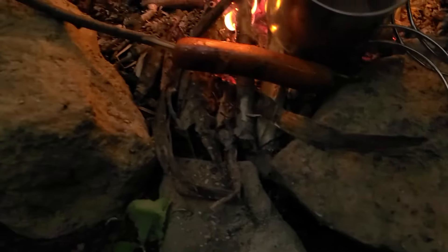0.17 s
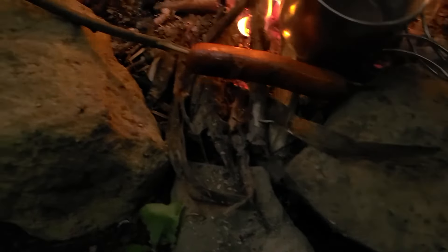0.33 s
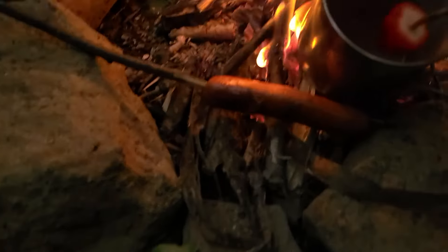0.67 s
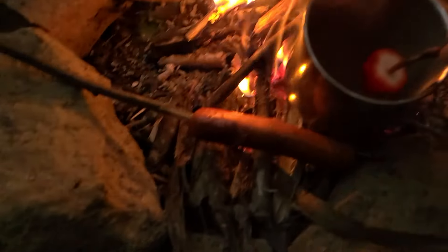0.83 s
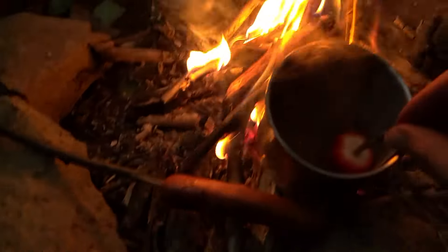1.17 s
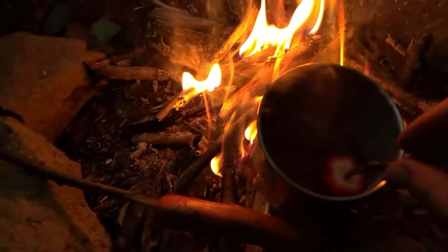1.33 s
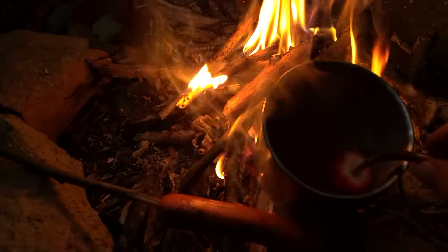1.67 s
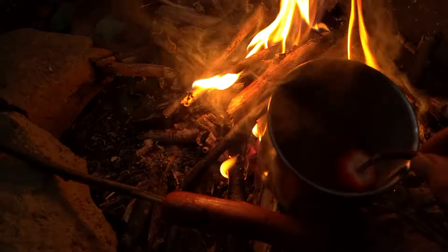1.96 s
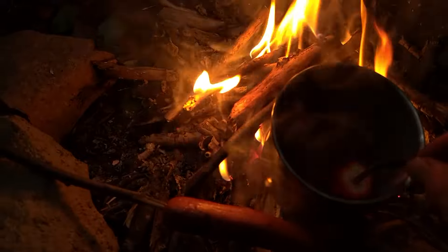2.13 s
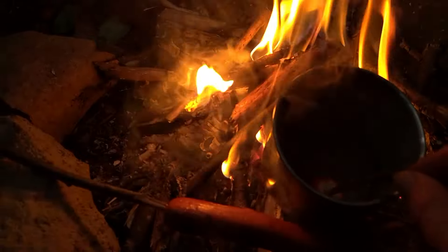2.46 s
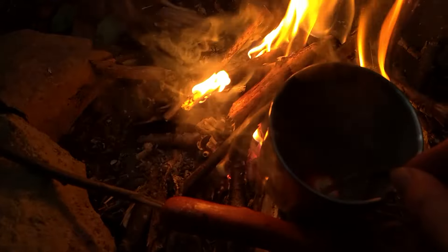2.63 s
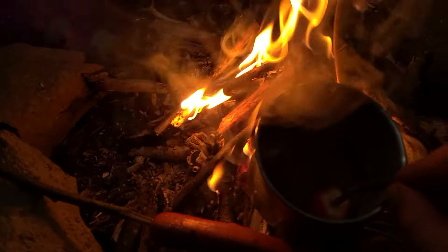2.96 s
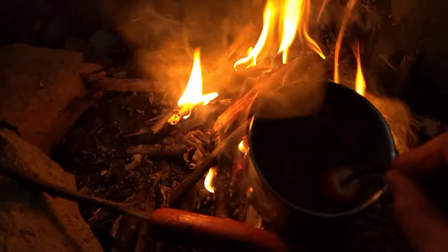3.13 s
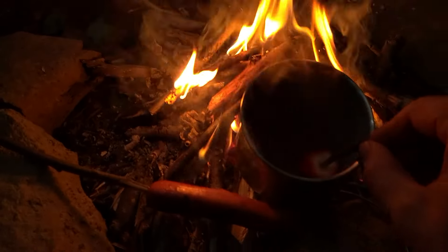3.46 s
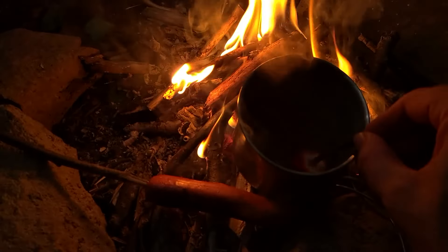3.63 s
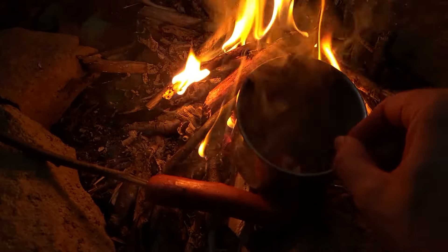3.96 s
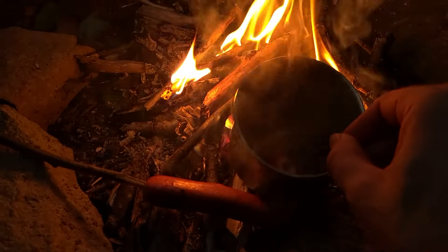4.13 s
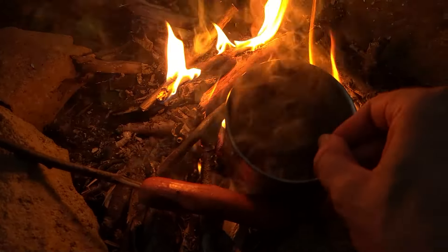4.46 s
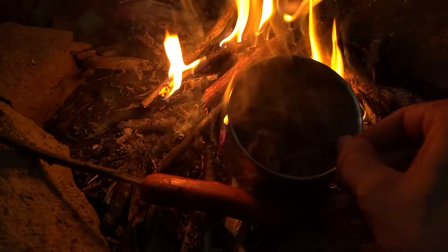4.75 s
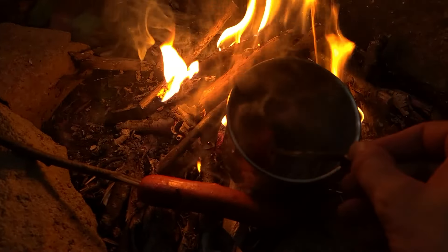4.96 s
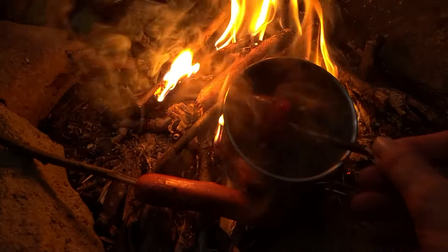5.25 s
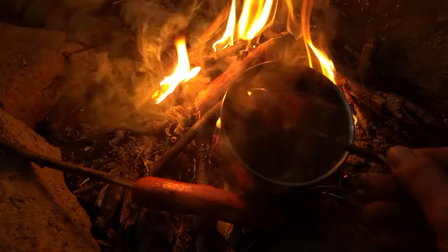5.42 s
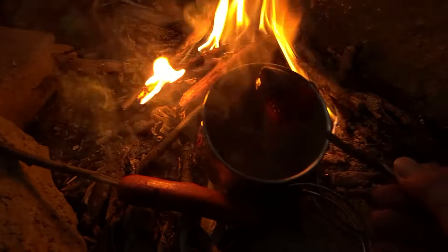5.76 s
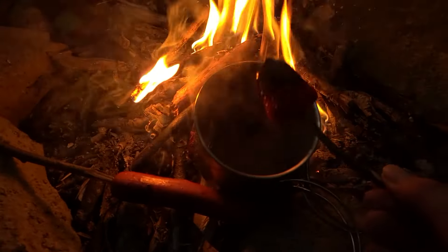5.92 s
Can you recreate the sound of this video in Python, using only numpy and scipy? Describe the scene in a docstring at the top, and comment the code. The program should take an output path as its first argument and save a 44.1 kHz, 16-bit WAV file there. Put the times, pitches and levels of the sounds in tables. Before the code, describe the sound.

Close, quiet campfire outdoors, flames rumbling softly under a fine wet hiss, with occasional crisp snaps, dull pops and tiny wheezing steam jets.

```python
"""Outdoors at a small campfire, heard close up. Flames rumble and flutter: low noise with a drifting level.
Now and then a pocket of gas gives a soft puff, a few swings of pressure. Damp wood sizzles in countless
tiny noise bursts, ticks and pops in short fading noise, and lets out steam: thin gliding whistles are
tones roughened by noise, breathy spurts are swelling bands of noise. A faint hush surrounds the fire."""
import sys
import numpy as np
from scipy import signal
from scipy.fft import rfft, irfft, next_fast_len
from scipy.io import wavfile
from scipy.ndimage import uniform_filter1d, map_coordinates

SR = 44100
rng = np.random.default_rng(int(sys.argv[2]) if len(sys.argv) > 2 else 0)


def output_pcm(signal):
    """Save a mono or channel-first signal as 16-bit PCM at the path in sys.argv[1].

    Samples are clipped to [-1, 1] before scaling.
    """
    pcm = np.clip(np.atleast_2d(signal).T, -1, 1) * 32767
    wavfile.write(sys.argv[1], SR, np.round(pcm).astype(np.int16))


N = 268657
TIME = np.arange(N) / SR  # seconds


def amp(db):
    """Turn decibels into a gain."""
    return 10 ** (np.asarray(db) / 20)


def unit(x):
    """Scale to an average (rms) strength of 1."""
    return x / np.sqrt(np.mean(x ** 2) + 1e-20)


def along(points, hz):
    """Read a value between (f/Hz, value) points, on a logarithmic frequency axis."""
    f, v = np.transpose(points)
    return np.interp(np.log(hz + 1), np.log(f + 1), v)


def curves(rows):
    """Draw one curve over the whole scene for each column after the time."""
    s, *columns = np.transpose(rows)
    return [np.interp(TIME, s, column) for column in columns]


def wobble(rate):
    """A smooth random curve through `rate` random points a second."""
    knots = rng.standard_normal(int(N * rate / SR) + 4)
    return map_coordinates(knots, [TIME * rate])


def filtered(x, response):
    """Split a sound into frequencies and multiply each by the gain that response(hz) gives."""
    size = x.shape[-1]
    padded = next_fast_len(size + SR // 4)
    spectrum = rfft(x, padded) * response(np.fft.rfftfreq(padded, 1 / SR))
    return irfft(spectrum, padded)[..., :size]


def band(size, hz, width_hz):
    """Stereo noise of rms 1 in a bell-shaped band around one frequency."""
    noise = rng.standard_normal((2, size))
    return unit(filtered(noise, lambda f: np.exp(-.5 * (2 * (f - hz) / width_hz) ** 2)))


def side_gains(pan_db):
    """Gains for left and right that differ by pan_db; positive leans left."""
    return amp([[pan_db / 2], [-pan_db / 2]])


def add(out, s, sound):
    """Mix a short sound in at s seconds."""
    start = max(round(s * SR), 0)
    part = out[:, start:][:, :sound.shape[-1]]
    part += sound[..., :part.shape[-1]]


def patchy(depth_db):
    """Two noises whose strength drifts in shared patches of time and frequency."""
    cells = signal.stft(rng.standard_normal((2, N)), nperseg=512)[2]
    field = rng.standard_normal(cells.shape[1:])
    field = uniform_filter1d(field, size=7, axis=0)  # smooth over frequency
    field = uniform_filter1d(field, size=12, axis=1)  # smooth over time
    uneven = cells * amp(depth_db * unit(field))
    return unit(signal.istft(uneven, nperseg=512)[1][:, :N])


def placed(pair, spectrum):
    """Colour two unrelated signals and mix them to stereo: the bass nearly alike in both ears, the treble not."""
    # left-right likeness: f/Hz, likeness (1 = identical)
    alike = [(60, 0.99), (130, 0.96), (290, 0.92), (640, 0.65), (1300, 0), (2300, 0.18), (4000, 0),
             (15000, 0)]

    def mid_side_gains(hz):
        turn = np.arccos(np.clip(along(alike, hz), -1, 1)) / 2
        return amp(along(spectrum, hz)) * [np.cos(turn), np.sin(turn)]

    mid, side = filtered(pair, mid_side_gains)
    return np.array([mid + side, mid - side]) / np.std(mid)


def flames(rumble_db=-0.5, flicker_db=0.7, flicker_rate=24, tips_db=-57.0, tips_follow=0.43,
           flutter_db=1.0, flutter_rate=40, rush_db=-1.02, gust_db=2.5):
    """Flickering flames rumble, their tips flutter along higher up, and air rushes softly through the logs."""
    # strength of the flames: t/s, level/dB before rumble_db
    flame = [(0.0, -50), (0.2, -51), (0.34, -45.5), (0.45, -46), (0.57, -44.5), (0.64, -50.5),
             (0.79, -55.5), (0.85, -49.5), (1.04, -48.5), (1.15, -49.5), (1.62, -53), (1.71, -50),
             (2.0, -50), (2.56, -54), (2.66, -47), (2.81, -52), (2.9, -48), (3.07, -51.5), (3.2, -45.5),
             (3.36, -51), (3.6, -50), (3.75, -50), (3.92, -51.5), (4.29, -47.5), (4.41, -57), (4.52, -48.5),
             (4.8, -52), (4.95, -47), (5.08, -51), (5.22, -47), (5.4, -48.5), (5.64, -48), (5.9, -52.5),
             (6.09, -52)]
    # air drawn through the logs: t/s, level/dB before rush_db
    draught = [(0.0, -67), (0.56, -64.5), (0.8, -68), (2.88, -67), (3.01, -69.5), (3.5, -65), (3.99, -68.5),
               (4.9, -66), (5.4, -65), (5.75, -61), (6.09, -65)]
    # tone colour of each part: f/Hz, relative level/dB
    rumble_colour = [(12, -31), (22, -14.5), (40, -9.5), (55, -3.5), (69, -0.2), (90, -4), (114, -8.5),
                     (150, -15.5), (200, -24), (400, -75)]
    tips_colour = [(90, -15.5), (130, -3.5), (150, -5.5), (175, -1.5), (220, -4.5), (280, -14.5),
                   (400, -29), (800, -53), (1600, -84)]
    rush_colour = [(120, -24), (300, 3), (450, 0.5), (650, -4.5), (900, -11), (1500, -12.5), (4000, -97)]

    strength_db = curves(flame)[0]
    mean_db = strength_db.mean()
    flare_db = strength_db - mean_db + flicker_db * wobble(flicker_rate)
    rumble = placed(rng.standard_normal((2, N)), rumble_colour)
    rumble *= amp(mean_db + flare_db + rumble_db)

    # the tips follow the flare only in part and flutter on their own
    tips = placed(rng.standard_normal((2, N)), tips_colour)
    tips *= amp(tips_db + tips_follow * flare_db + flutter_db * wobble(flutter_rate))

    rush = placed(patchy(depth_db=0.34), rush_colour)
    rush *= amp(curves(draught)[0] + rush_db + gust_db * wobble(60))
    return rumble + tips + rush


def puffs():
    """A pocket of gas catches fire, swells and collapses: a few smooth swings of pressure."""
    # pockets of gas: t/s (middle), level/dB, f/Hz, half-length/cycles
    gas_pockets = [(0.347, -33.5, 65.5, 0.79), (0.401, -32, 89, 0.35), (0.515, -39, 78.5, 1.2),
                   (0.555, -40, 63, 0.84), (1.871, -34, 119, 0.35), (2.878, -43, 74.5, 0.98),
                   (3.312, -44, 267, 0.23), (4.28, -42, 47, 0.59), (4.599, -36, 88.5, 0.48),
                   (5.098, -46.5, 305, .35), (5.487, -38, 76, 0.55), (5.835, -35, 108, 0.3)]
    out = np.zeros(N)
    for s, db, hz, cycles in gas_pockets:
        u = (TIME - s) * hz  # time counted in cycles
        out += amp(db) * np.sin(2 * np.pi * u) * np.exp(-.5 * (u / cycles) ** 2)
    return out


def sizzle(rate=600, spread_db=4.5, t60=0.0048, grain_db=-9, hiss_db=3.0, seep_db=-5.0,
           flicker_db=0.69, clump_db=6.5):
    """Sap boils out of the wood: tiny bursts, `rate` a second, merge into a hiss, and steam seeps out."""
    # boiling of the damp wood: t/s, sizzle level/dB before hiss_db, steam level/dB before seep_db
    boiling = [(0.0, -66, -71), (0.56, -66, -64.5), (0.84, -64.5, -65.5), (2.24, -63.5, -62.5),
               (3.18, -66, -63.5), (3.7, -64.5, -63), (3.94, -65, -65), (4.78, -65, -64),
               (5.04, -64.5, -65), (6.09, -65, -64.5)]
    # tone colour of hiss and steam: f/Hz, relative level/dB
    hiss_colour = [(700, -38), (1500, -8.5), (2000, -2.5), (2700, -3), (3600, -1), (5000, -5.5),
                   (6200, 2.5), (7200, 1.5), (8000, -6), (8900, -27), (10000, -11), (11500, -8),
                   (13500, -7), (16000, -11.5)]
    steam_colour = [(1500, -29), (2800, -4), (3800, -5), (4600, -9), (6000, -7), (9000, -43)]
    biggest_burst = 3.4  # in multiples of spread_db

    boil_db, steam_db = curves(boiling)
    flicker = wobble(42)
    chance = rng.random(N)
    size = np.minimum(rng.exponential(size=N), biggest_burst)
    # the bursts grow stronger and weaker in clumps
    bursts = (chance < rate / SR) * amp(spread_db * size + clump_db * np.tanh(flicker))
    fade = amp(-60 * np.arange(SR // 50) / SR / t60)  # falls 60 dB in t60 seconds
    grains = unit(signal.fftconvolve(bursts, fade)[:N] * rng.standard_normal((2, N)))

    hiss = placed(patchy(depth_db=1.6) + amp(grain_db) * grains, hiss_colour)
    hiss *= amp(boil_db + hiss_db + flicker_db * flicker)
    steam = amp(steam_db + seep_db) * placed(patchy(depth_db=-0.2), steam_colour)
    return hiss + steam


def ticks(t60=0.0069, rise=.0001, top_db=-8.0, body_db=-14.5, level_db=-2):
    """Wood fibres snap: a bright noise in three broad bands starts sharply and dies within milliseconds."""
    # splitting wood: t/s, level/dB before level_db, middle band/dB, left minus right/dB
    snaps = [(0.542, -42, 0, -1), (0.5932, -43, -3, 2), (1.319, -46, -1, 6), (2.146, -42, -2, 6),
             (2.5692, -40.5, -4.5, 11), (2.6537, -41.5, -1.5, 13), (2.6904, -41, -11, 5),
             (3.097, -47, -1, 6), (3.692, -33.5, -13, 11), (3.697, -42, -8, 11), (3.7956, -38, -6, 7),
             (3.8134, -51, 4, 4), (4.113, -41, -4, 10), (4.197, -33, -10, 1), (4.219, -50, 1, 4),
             (4.5075, -51.5, 7, 8), (4.821, -49, 6, 9), (5.0454, -42.5, -3, 5), (5.5282, -36.5, -5.5, 11),
             (5.5444, -39.5, -8, 11)]
    out, t = np.zeros((2, N)), np.arange(SR // 30) / SR
    for s, db, middle_db, pan_db in snaps:
        crack = amp(top_db) * band(len(t), 13300, 3600)
        crack += amp(middle_db) * band(len(t), 6480, 1400)
        crack += amp(body_db) * band(len(t), 3860, 1300)
        fade = amp(db + level_db - 60 * t / t60) * (1 - np.exp(-t / rise))
        add(out, s, fade * crack * side_gains(pan_db))
    return out


def pops(t60=0.011, hz=500, width_hz=1300):
    """Dull bursts deep in the embers: low noise that fades by 60 dB in t60 seconds."""
    # bursts in the embers: t/s, starting level/dB
    ember_bursts = [(1.108, -53), (2.501, -49), (2.848, -50.5), (3.311, -66), (3.701, -53), (3.726, -42),
                    (5.675, -47), (5.834, -48)]
    out, t = np.zeros((2, N)), np.arange(SR // 20) / SR
    for s, db in ember_bursts:
        add(out, s, amp(db - 60 * t / t60) * band(len(t), hz, width_hz)[0])
    return out


def whistles(width_hz=300, sputter_db=3, sputter_hz=80):
    """Steam sings and sputters in narrow cracks: each tone glides along a smooth curve of pitch."""
    # steam whistles: start t/s, length/s, first f/Hz, middle f/Hz, last f/Hz, level/dB,
    # hoarseness (ratio to the pure tone), left minus right/dB before the fire's own lean
    whistling = [(0.025, 0.061, 1870, 1955, 2030, -65, .3, -9),
                 (0.095, 0.022, 2100, 2160, 2210, -65, .4, -1),
                 (0.385, 0.087, 3260, 2900, 2700, -65, .6, -1),
                 (0.471, 0.046, 2760, 2830, 2700, -63.5, .35, -5),
                 (0.515, 0.088, 2600, 2330, 2140, -66, .3, 1),
                 (1.056, 0.048, 3130, 3200, 3100, -64, .4, -9),
                 (1.105, 0.048, 2930, 2690, 2520, -66, 1.8, -6),
                 (1.348, 0.068, 2190, 2380, 2560, -68, .35, 1),
                 (1.968, 0.042, 2180, 2200, 2480, -65, .3, 2),
                 (2.165, 0.09, 2370, 2500, 2490, -65.5, .2, -4),
                 (2.248, 0.03, 2990, 3210, 2900, -62, .3, -4),
                 (2.305, 0.067, 2570, 2510, 2270, -66, .3, -3),
                 (2.398, 0.038, 2190, 2280, 2380, -69, .4, 2), (2.748, 0.04, 3110, 3500, 3600, -65, .8, -3),
                 (2.869, 0.06, 2130, 2470, 2690, -67, .9, 1), (2.98, 0.05, 2760, 2460, 2130, -67.5, .8, 3),
                 (3.294, 0.052, 2710, 2460, 2300, -66, .8, 6),
                 (3.575, 0.055, 3490, 2840, 2560, -69, .6, -7),
                 (3.622, 0.032, 1930, 1960, 1990, -68, .3, -3),
                 (3.634, 0.04, 2510, 2760, 2900, -66, .6, -4),
                 (3.683, 0.035, 3200, 2750, 2600, -66.5, 1, 3),
                 (3.701, 0.12, 2900, 3000, 3160, -71, .9, -5), (4.265, 0.06, 2640, 2400, 2160, -71, .8, 4),
                 (4.66, 0.064, 2365, 2630, 2900, -65.5, .5, -1),
                 (4.728, 0.038, 2700, 2520, 2430, -65, 1, 1),
                 (4.753, 0.085, 2210, 2170, 2155, -67.5, .3, 1),
                 (4.82, 0.098, 3300, 3040, 2460, -67, .9, 2), (5.645, 0.037, 3180, 3380, 3320, -66, .9, 0),
                 (5.675, 0.053, 2630, 2860, 3480, -65, .8, -6),
                 (5.727, 0.047, 3610, 4000, 4130, -64, 1.4, -3)]
    # how far the left side runs ahead of the right: f/Hz, lead/radians
    left_lead = [(2000, .3), (2500, 1.2), (2800, 1.2), (3200, 2.6)]
    out = np.zeros((2, N))
    for s, length, first, middle, last, db, hoarse, pan_db in whistling:
        u = np.linspace(0, 1, int(length * SR))
        size = len(u)
        pitch = np.polyval(np.polyfit([0, .5, 1], [first, middle, last], 2), u)
        phase = 2 * np.pi * np.cumsum(pitch) / SR
        # turbulence in the jet shakes the tone's strength and phase
        shake = band(size, 0, width_hz) * np.cos(phase)
        shake += band(size, 0, width_hz) * np.sin(phase)
        pure = np.cos(phase + along(left_lead, pitch) * np.array([[.5], [-.5]]))
        sputter = amp(sputter_db * band(size, 0, sputter_hz)[0])
        tone = unit(sputter * (pure + hoarse * shake / np.sqrt(2)))
        swell = np.sqrt(np.abs(np.sin(np.pi * u)))
        add(out, s, amp(db) * swell * tone * side_gains(pan_db))
    return out


def spurts(level_db=1):
    """Wider cracks let off short breathy jets of steam: bands of noise that swell and sink."""
    # jets of steam: middle t/s, length/s, f/Hz, width/Hz, level/dB before level_db
    jets = [(1.32, 0.055, 3920, 1500, -58), (1.375, 0.063, 4300, 700, -63), (1.869, 0.44, 4200, 1100, -64),
            (2.055, 0.023, 4150, 900, -58.5), (2.17, 0.036, 3740, 900, -60.5),
            (2.283, 0.023, 3750, 700, -60.5), (3.31, 0.014, 4020, 700, -60), (3.481, .13, 1020, 239, -59.5),
            (3.68, 0.2, 3000, 600, -67), (3.729, 0.1, 1090, 750, -66), (5.735, .2, 3200, 450, -66)]
    out = np.zeros((2, N))
    for s, length, hz, width_hz, db in jets:
        size = int(length * SR)
        swell = np.sin(np.linspace(0, np.pi, size))
        add(out, s - length / 2, amp(db + level_db) * swell * band(size, hz, width_hz))
    return out


def air():
    """The faint hush of the surroundings: soft noise with a slowly changing level."""
    # the hush: t/s, level/dB
    hush = [(0, -68.5), (1.0, -69), (3.75, -68.5), (4.0, -70.5), (6.09, -70.8)]
    # its tone colour: f/Hz, relative level/dB
    hush_colour = [(450, -23), (720, -7), (900, 1), (1250, 0), (1600, -10.5), (2200, -8), (5000, -35)]
    return amp(curves(hush)[0]) * placed(patchy(depth_db=1), hush_colour)


def scene():
    """The fire in open air, its hiss a little to the left; the ticks keep their own places."""
    # sideways lean of everything but the ticks: f/Hz, left minus right/dB
    lean = [(60, -1), (200, 0.8), (380, -3), (700, -1.5), (1290, 3), (2380, -0.5), (4400, 1), (8000, 2.6),
            (14000, 1.5)]
    fire = flames() + puffs() + sizzle() + pops() + whistles() + spurts() + air()
    leaning = filtered(fire, lambda hz: amp(np.outer([.5, -.5], along(lean, hz))))
    return leaning + ticks()


def record(dry, top_hz=15850):
    """The band limit: nothing at or above top_hz passes."""
    return filtered(dry, lambda hz: hz < top_hz)


dry = scene()
out = record(dry)
output_pcm(out)
```